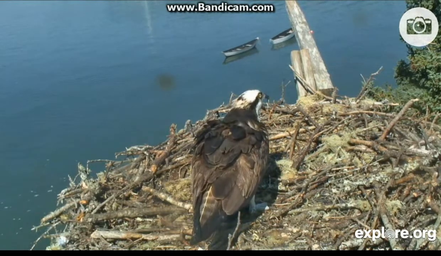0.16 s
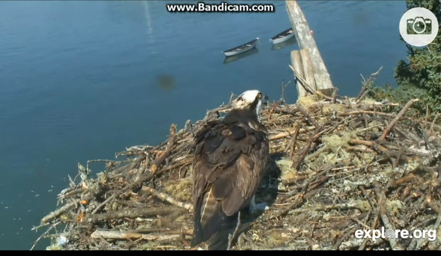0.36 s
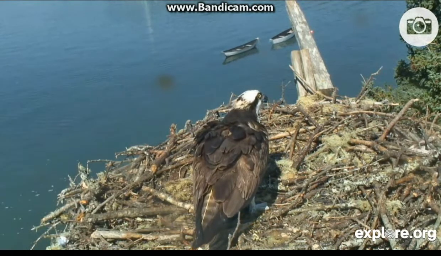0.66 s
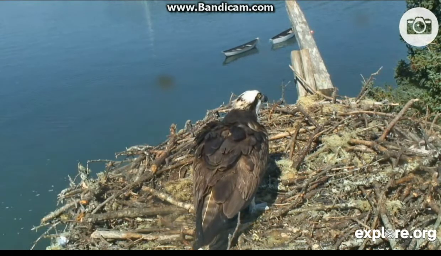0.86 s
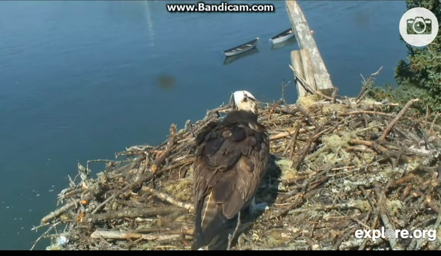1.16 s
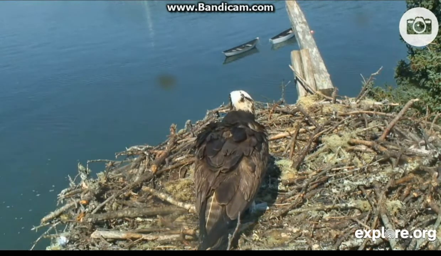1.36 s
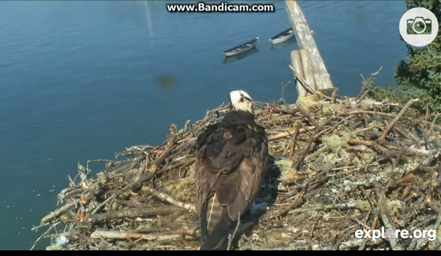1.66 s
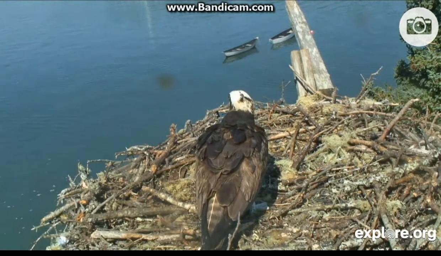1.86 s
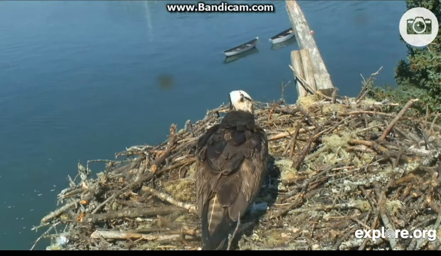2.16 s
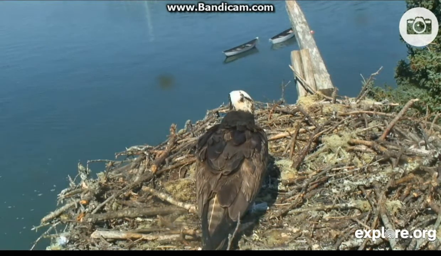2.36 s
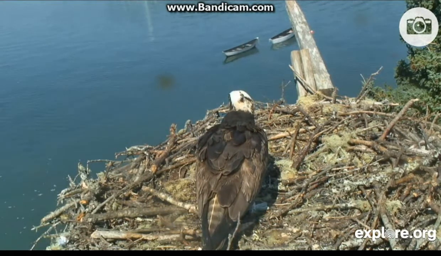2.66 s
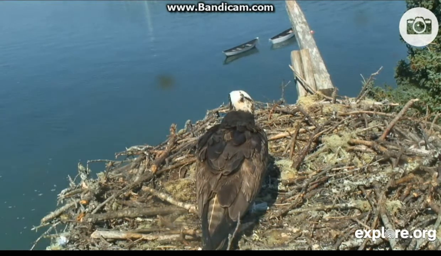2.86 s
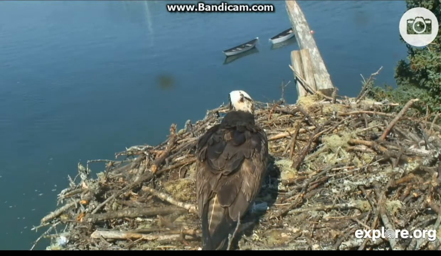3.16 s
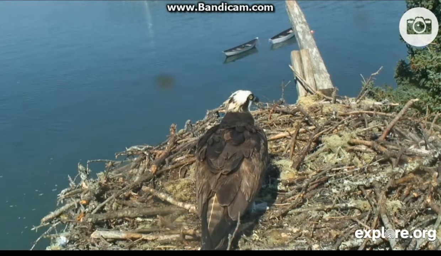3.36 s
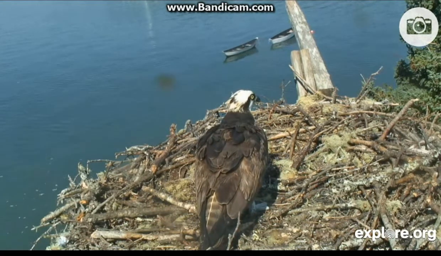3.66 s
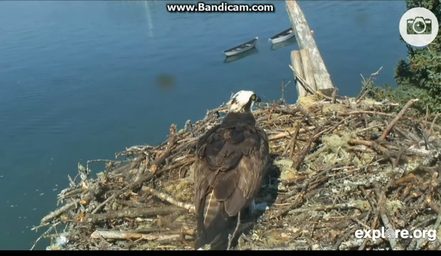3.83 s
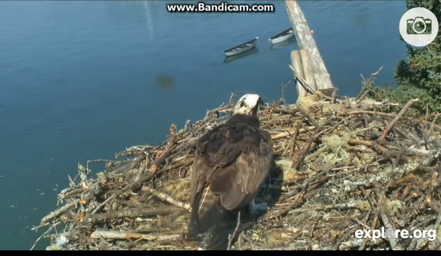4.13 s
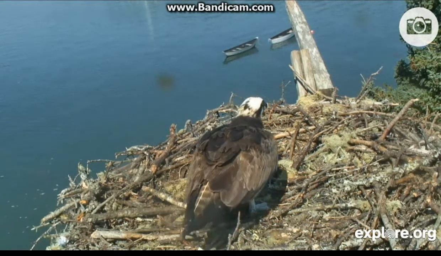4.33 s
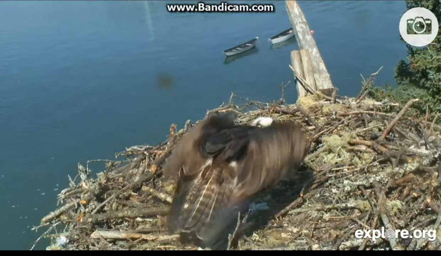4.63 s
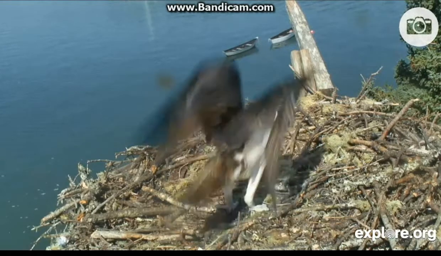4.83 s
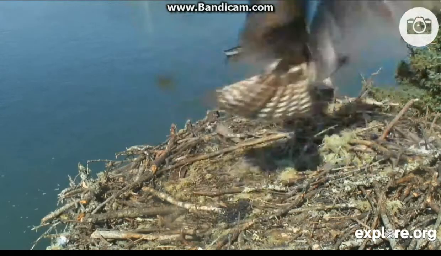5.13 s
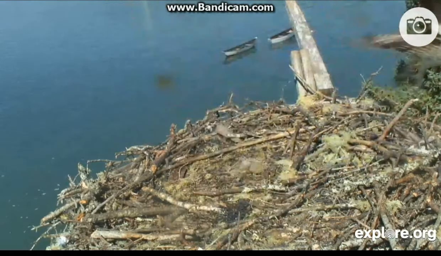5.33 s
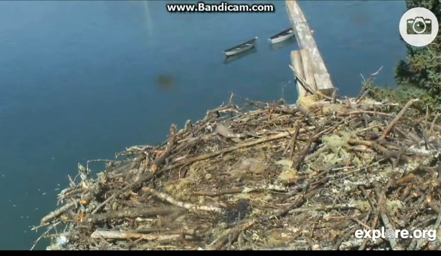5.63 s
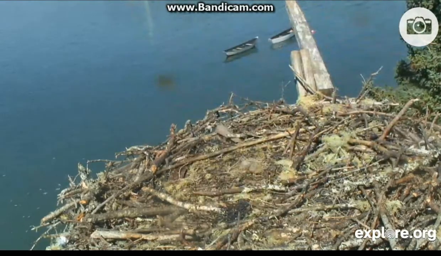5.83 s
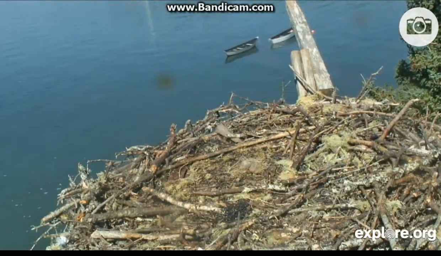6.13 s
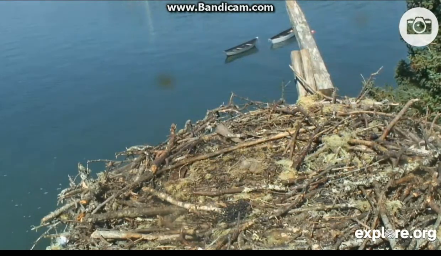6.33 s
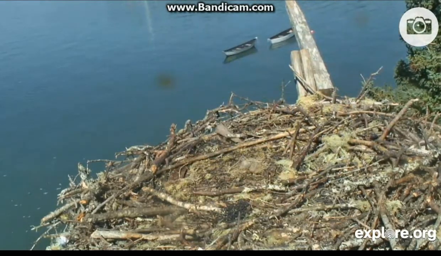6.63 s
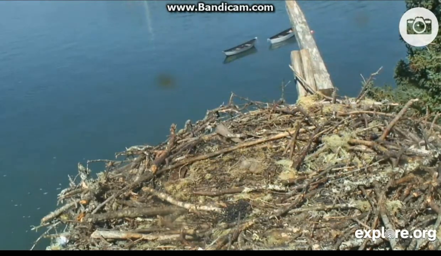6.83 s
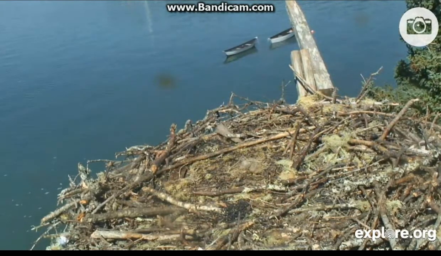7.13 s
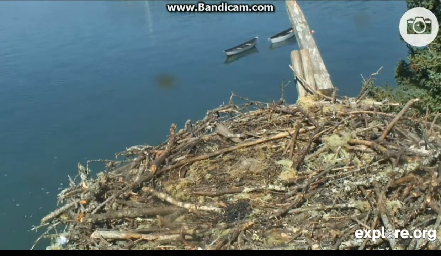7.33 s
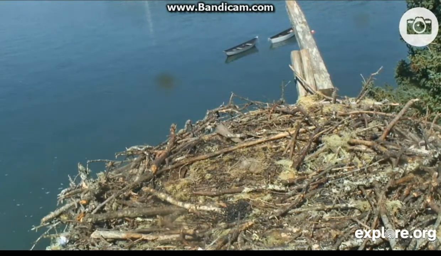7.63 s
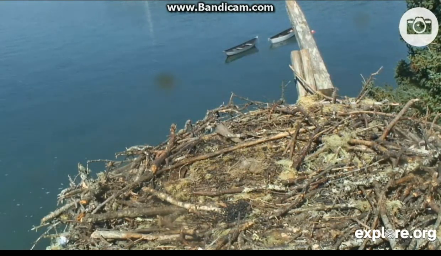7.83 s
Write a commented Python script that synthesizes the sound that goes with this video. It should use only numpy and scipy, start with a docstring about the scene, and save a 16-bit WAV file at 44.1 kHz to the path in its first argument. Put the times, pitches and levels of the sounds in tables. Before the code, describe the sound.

Outdoors at a stick nest above a calm bay, a steady low hum throbs under soft hiss and thin whines. Small waves lap and plip faintly. After about two seconds an osprey gives a few very short, high whistled chirps and clucks, with a faint shore echo. Dry sticks rustle close by and a twig snaps sharply; then only hum and water remain, with a soft wind puff at the end.

```python
"""A stick nest above a quiet bay, where an osprey gives a few short two-voiced chirps, a peep and two clucks.
Its voices are gliding tones with overtones, and the shore returns them as softly scattered echoes.
Filtered random impacts make the nest material rustle close by; damped modes ring as a twig snaps.
Small waves lap below as grainy noise and rising bubble tones.
The nest camera adds a throbbing hum of two close tones, thin whines and hiss."""
import sys
import numpy as np
from scipy import signal
from scipy.fft import rfft, irfft, next_fast_len
from scipy.io import wavfile
from scipy.ndimage import uniform_filter1d, map_coordinates

SR = 44100
rng = np.random.default_rng(int(sys.argv[2]) if len(sys.argv) > 2 else 0)


def bounce(signal):
    """Save signal as a 16-bit WAV file at the path given by the first command-line argument."""
    frames = np.transpose(np.atleast_2d(signal))
    limited = np.clip(frames, -1, 1)
    pcm = np.round(limited * 32767).astype(np.int16)
    wavfile.write(sys.argv[1], SR, pcm)


N = 352359  # samples


def amp(db):
    """Level to gain: 20 dB is a factor of ten in amplitude."""
    return 10 ** (np.asarray(db) / 20)


def unit(x):
    """Normalisation: scale to rms 1."""
    return x / np.sqrt(np.mean(x ** 2) + 1e-20)


def along(points, hz):
    """Interpolation of (Hz, value) points on a logarithmic frequency axis."""
    f, v = np.transpose(points)
    return np.interp(np.log(hz + 1), np.log(f + 1), v)


def wobble(rate):
    """Slow random modulation: a smooth curve through rate random knots a second."""
    knots = rng.standard_normal(int(N * rate / SR) + 4)
    return map_coordinates(knots, [np.arange(N) * rate / SR])


def filtered(x, response):
    """Linear filtering: multiply the spectrum by a response of frequency."""
    m = next_fast_len(N + SR // 2)  # padded so that the end does not wrap round
    return irfft(rfft(x, m) * response(np.fft.rfftfreq(m, 1 / SR)), m)[:N]


def coloured(x, spectrum):
    """Spectral shaping: x filtered by (Hz, dB) points, at rms 1."""
    return unit(filtered(x, lambda hz: amp(along(spectrum, hz))))


def grains(rate, spread_db):
    """Shot noise: random tiny impacts, rate a second, of uneven size, at rms 1."""
    impacts = (rng.random(N) < rate / SR) * rng.standard_normal(N)
    return unit(impacts * amp(spread_db * np.clip(rng.standard_normal(N), -2, 2)))


def add(track, s, sound):
    """Superposition: mix a sound into the track at time s."""
    part = track[max(round(s * SR), 0):][:len(sound)]
    part += sound[:len(part)]


def swell(crest, db, build, ebb):
    """Gaussian envelope: a rounded rise and fall, one gain per sample."""
    t = np.arange(N) / SR - crest
    return amp(db) * np.exp(-(t / np.where(t < 0, build, ebb)) ** 2 / 2)


def together(gains):
    """Incoherent summation: the powers of unrelated sounds add."""
    return np.sqrt(sum(g ** 2 for g in gains))


def whistle(length, glide_hz, jitter, swell_db=0, octave_db=-26, third_db=-42, rasp=4):
    """Frequency modulation: one voice and two overtones glide through evenly spaced pitches."""
    u = np.linspace(0, 1, max(int(length * SR), 8))
    pitch = np.interp(u, np.linspace(0, 1, len(glide_hz)), glide_hz)
    noise = rng.standard_normal((2, SR // 10))
    waver, shimmer = unit(uniform_filter1d(noise, size=24))[:, :len(u)]
    phase = 2 * np.pi * np.cumsum(pitch * (1 + jitter * waver)) / SR
    effort = np.abs(np.sin(np.pi * u)) ** .7
    # overtones come out at full effort and are rougher than the fundamental
    overtones = amp(octave_db) * np.sin(2 * phase) + amp(third_db) * np.sin(3 * phase)
    overtones = overtones * effort ** 2 * (1 + 10 * rasp * jitter * shimmer)
    return amp(swell_db * (u - .5)) * effort * (np.sin(phase) + overtones)


# Background spectrum: frequency_hz, relative density_db [dB per Hz]
HISS = [(25, -7.5), (50, -5), (85, -1.5), (135, -2), (170, -5), (300, -10), (520, -7.5), (700, -19.5),
        (1050, -15.5), (1500, -25.5), (2600, -31), (5000, -32.5), (9000, -34), (12000, -35)]
# Narrow noise humps: centre_hz, width_hz (at half amplitude), level_db (rms)
HISS_PEAKS = [(3063, 130, -84.5), (3697, 690, -81)]


def hiss(hiss_db=-66.0):
    """Stationary noise: a steady broad spectrum with two resonance humps in the treble."""
    out = amp(hiss_db) * coloured(rng.standard_normal(N), HISS)
    for centre, width, db in HISS_PEAKS:
        hump = filtered(rng.standard_normal(N), lambda hz: 1 / (1 + (2 * (hz - centre) / width) ** 2))
        out = out + amp(db) * unit(hump)
    return out


# Two close hum tones: pitch_hz
HUM_HZ = (107.45, 103.116)
# The same two tones: level_db (rms)
HUM_DB = (-45, -60)
HUM_CREST_S = .04  # a moment when the two tones are in phase
# Thin whines: pitch_hz, level_db (rms), waver [0-1]
WHINES = [(211.7, -73.5, 1), (232.1, -79.5, 0.7), (367, -99, 0.8), (430, -72.5, 0.1), (543.6, -78, 0.94),
          (573.6, -81, 0.5), (649.6, -85.5, 0.4), (1029, -78, 0.06), (3117, -86.5, 0.3), (3827, -91, 0.2)]


def hum(drift=0.036, waver_rate=18):
    """Beating: two close low tones throb together, under whines wavering in strength and phase."""
    turn = 2 * np.pi * (np.arange(N) / SR - HUM_CREST_S)
    out = sum(np.sqrt(2) * amp(db) * np.cos(hz * turn) for hz, db in zip(HUM_HZ, HUM_DB))
    out = out * (1 + drift * wobble(15))
    for hz, db, waver in WHINES:
        strength = 1 + 0.33 * waver * wobble(waver_rate)
        tone = np.sin(hz * turn + 1.32 * waver * wobble(waver_rate))
        out = out + amp(db) * unit(strength * tone)
    return out


# Wind puff on the microphone: crest_s, level_db, build_s, ebb_s
GUST = (7.88, -60.5, .08, .35)


def wind():
    """Wind noise: a soft puff rumbles on the microphone, mostly at low frequencies."""
    rumble = [(10, -13), (35, -4), (70, -15.5), (300, -37), (1500, -78.0)]  # Hz, dB
    return swell(*GUST) * coloured(rng.standard_normal(N), rumble)


def bubbles(centre_hz=1500, cycles=9, count=2800):
    """Bubble resonance: many tiny overlapping rings that rise in pitch, at rms 1."""
    out = np.zeros(N)
    for when, (pitch, size) in zip(rng.random(count), rng.standard_normal((count, 2))):
        start_hz = centre_hz * np.exp(.35 * pitch)
        u = np.linspace(0, 1, max(int(cycles * SR / start_hz), 8))
        ring = np.sin(2 * np.pi * cycles * u * (1 + 0.098 * u))
        add(out, when * N / SR, amp(2 * min(size, 1.5)) * ring * np.sin(np.pi * u) * np.exp(-u))
    return unit(out)


# Wavelets reaching the shore: crest_s, relative level_db, build_s, ebb_s
WAVES = [(1.35, -74, .45, 0.5), (1.91, -74, 0.1, .1), (3.0, -67.5, 0.26, 0.31), (4.62, -70.5, 0.54, 0.23),
         (5.99, -71, .015, 0.034), (6.13, -69, 0.051, 0.046), (6.28, -70, 0.06, 0.066),
         (7.58, -73.5, 0.06, 0.045), (7.7, -72.5, 0.041, 0.11)]
RIPPLE_DB = -78  # lapping between the wavelets, on the wavelets' scale
# Spectrum of the wash: frequency_hz, relative density_db [dB per Hz]
WASH = [(150, -10), (500, -1), (1200, -7.5), (2400, -13), (4500, -18.5), (9000, -30.5)]
# Spectrum of fine droplet ticks: frequency_hz, relative density_db [dB per Hz]
DROPLETS = [(500, -16), (1100, -3), (1700, 0), (2600, -2), (3500, -12), (6000, -30)]
DROPLET_RATE, DROPLET_DB = 350, -8  # per s, dB relative to the wavelet
# Small splashes: start_s, level_db (near the peak), centre_hz, length_s
SPLASHES = [(1.184, -65, 1294, 0.027), (1.193, -62, 647, 0.027), (1.329, -68, 1740, 0.019),
            (1.387, -59, 1250, 0.022), (1.392, -70, 1850, 0.013), (1.487, -64, 1200, .012),
            (1.662, -61, 2320, 0.0087), (4.419, -54, 637, 0.0094), (4.424, -70, 1790, 0.0093),
            (4.508, -64, 1240, .014), (4.54, -69, 1490, 0.014), (4.561, -60.5, 1150, 0.01),
            (4.573, -61, 550, 0.019), (4.604, -63, 1290, 0.013), (4.758, -62, 2650, 0.0072),
            (5.983, -68, 1750, 0.015), (6.139, -64, 680, .015), (6.276, -65, 2100, .012),
            (6.877, -71, 2410, 0.016), (7.575, -71, 1470, .014), (7.691, -64, 660, 0.023)]
BUBBLE_RISE, SPLASH_JITTER = (.86, 1.14), .12  # shares of a splash's pitch


def water(wash_db=-2.5, bubble_db=-3.5):
    """Bubble acoustics: wavelets wash, bubble and tick with droplets; brief splashes rise in pitch."""
    lap = together([swell(*wave) for wave in WAVES] + [amp(RIPPLE_DB)])
    wash = amp(wash_db) * coloured(grains(rate=2500, spread_db=1), WASH)
    # bubbles gain on the wash as a wavelet crests
    bubbling = amp(bubble_db) * np.sqrt(lap / lap.max()) * bubbles()
    droplets = amp(DROPLET_DB) * coloured(grains(rate=DROPLET_RATE, spread_db=2.5), DROPLETS)
    out = lap * (wash + bubbling + droplets)
    for s, db, centre_hz, length in SPLASHES:
        add(out, s, amp(db) * whistle(length, centre_hz * np.array(BUBBLE_RISE), SPLASH_JITTER, rasp=0))
    return out


SHUFFLE_RISE_S = 0.017


def shuffle(s, fade):
    """Frictional decay: a quick push into the nest material, which then comes to rest."""
    t = np.arange(N) / SR - s
    return np.exp(-np.where(t < 0, (t / SHUFFLE_RISE_S) ** 2 / 2, t / fade))


# Shuffles in the nest: peak_s, fade_s (time constant), crackle_db, relative bump_db
SHUFFLES = [(0.93, 0.035, -83, -57.5), (1.0, 0.072, -91, -63), (2.771, 0.12, -72, -67),
            (2.89, 0.18, -66.5, -60), (3.03, 0.096, -71, -62), (3.109, 0.051, -82, -49),
            (3.143, 0.07, -66, -58), (3.3, 0.031, -68.5, -66), (3.395, 0.092, -70, -57),
            (3.58, 0.036, -75.5, -67), (3.679, 0.042, -70, -58)]
# Spectrum of the fine crackle: frequency_hz, relative density_db [dB per Hz]
CRACKLE = [(900, -18), (1800, 5), (3500, 8), (6000, 3.5), (9000, 4.5), (12000, -4)]
# Spectrum of the dull bumps: frequency_hz, relative density_db [dB per Hz]
BUMP = [(30, 1), (150, 5.5), (300, -2.5), (480, 7), (700, -3.5), (950, -2), (1500, -12), (3000, -23.5),
        (6000, -29)]
# Dry stems settling afterwards: crest_s, level_db, build_s, ebb_s
SETTLING = (3.7, -82, .5, .45)
# Spectrum of the settling: frequency_hz, relative density_db [dB per Hz]
SETTLING_COLOUR = [(1500, -10), (4000, -8), (7000, -9), (8800, 4), (10200, -8), (12000, -12)]


def rustle(bump_db=-3):
    """Crackling noise: dry nest material gives fine impacts and dull bumps at each shuffle, then settles."""
    pushes = [(shuffle(s, fade), fine_db, dull_db) for s, fade, fine_db, dull_db in SHUFFLES]
    crackle = together(amp(db) * push for push, db, _ in pushes)
    bump = together(amp(db) * push for push, _, db in pushes)
    fine = coloured(grains(rate=10000, spread_db=-6), CRACKLE)
    dull = coloured(grains(rate=4500, spread_db=4.0), BUMP)
    settling = swell(*SETTLING) * coloured(grains(rate=11000, spread_db=-0.5), SETTLING_COLOUR)
    return crackle * fine + amp(bump_db) * bump * dull + settling


def burst(length, centre_hz, sharpness):
    """Band resonance: a brief noisy ring in one band."""
    hz = np.fft.rfftfreq(SR // 5, 1 / SR) + 1
    u = np.linspace(0, 1, max(int(length * SR), 8))
    band = 1 / (1 + (sharpness * (hz / centre_hz - centre_hz / hz)) ** 2)
    noise = irfft(rfft(rng.standard_normal(SR // 5)) * band)[:len(u)]
    return unit(noise) * np.sin(np.pi * u) * np.exp(-u)


# Twigs scraping over each other: crest_s, level_db, build_s, ebb_s (its sign has no effect)
SCRAPE = (3.5, -79, 0.32, -0.1)
# Single stems ticking in the nest: start_s, level_db (rms before the envelope), centre_hz
STEMS = [(0.562, -63, 2400), (.934, -58.5, 1580), (.946, -62, 1900), (1.022, -66, 2100), (1.191, -69, 1570),
         (1.497, -64, 2500), (2.751, -57.5, 1600), (2.765, -66, 2600), (2.927, -60, 1200),
         (3.008, -54.5, 1900), (3.048, -58, 2200), (3.142, -53, 1050), (3.21, -60, 1800),
         (3.309, -66, 2700)]
STEM_S = 0.0064  # length of a tick


def stems():
    """Stick-slip friction: twigs scrape in a dense crackle and single stems tick."""
    colour = [(400, -22), (1100, 1), (2200, -4), (3800, -10), (6000, -20)]  # Hz, dB per Hz
    out = swell(*SCRAPE) * coloured(grains(rate=860, spread_db=-4), colour)
    for s, db, centre_hz in STEMS:
        add(out, s, amp(db) * burst(STEM_S, centre_hz, sharpness=2.2))
    return out


# The snap: start_s, level_db, crack_db (relative to level_db)
SNAPS = [(3.2722, -39, -3.5)]
# Modes of the stick: pitch_hz, level_db (relative to the snap), t60_s
TWIG = [(333, -7, 0.02), (545, -2, 0.03), (880, -4, 0.017), (2640, -10, 0.0087), (3320, -1, 0.005),
        (5400, -6.5, 0.0079), (9100, 3, 0.002)]


def twig(crack_t60=0.012):
    """Modal decay: fracture gives a sharp crack of noise and leaves the stick's modes ringing briefly."""
    out, t = np.zeros(N), np.arange(SR // 10) / SR
    for s, db, crack_db in SNAPS:
        ring = np.zeros(len(t))
        for k, (hz, level, t60) in enumerate(TWIG):
            direction = (-1) ** k  # the modes swing in alternating directions
            ring += direction * amp(level - 60 * t / t60) * np.sin(2 * np.pi * hz * t)
        crack = amp(crack_db - 60 * t / crack_t60) * rng.standard_normal(len(t))
        add(out, s, amp(db) * (ring + crack))
    return out


# Echoes from the nearby shore: delay_s, level_db (relative to the call), spread_s
ECHOES = [(.019, -25, .004), (.046, -19, .01), (.105, -24.5, .016)]
# Decay of the tail: frequency_hz, t60_s
SHORE = [(500, .6), (2500, 0.69), (8000, .23)]


def shore(x, tail_db=-23, delay=.03, size=640):
    """Diffuse scattering: shore and trees return each call as a grainy haze of its own pitches."""
    frames = dict(fs=SR, nperseg=size, noverlap=size - size // 4)
    hz, t, z = signal.stft(x, **frames)
    lag = t[t < 1]
    shares = lambda power: (power / power.sum(axis=-1, keepdims=True))
    decay = (lag > delay) * amp(-60 * lag / along(SHORE, hz)[:, None]) ** 2
    answer = amp(tail_db) ** 2 * shares(decay)
    for s, db, spread in ECHOES:
        answer = answer + amp(db) ** 2 * shares(np.exp(-((lag - s) / spread) ** 2))
    # powers are spread over time, then carried by random phases
    power = np.abs(signal.fftconvolve(np.abs(z) ** 2, answer, axes=1)[:, :len(t)])
    scatter = signal.stft(rng.standard_normal(N), **frames)[2]
    return signal.istft(np.sqrt(power) * scatter / scatter.std(), **frames)[1][:N]


# Two-voiced chirps: start_s, length_s, upper_hz, upper_db, upper_octave_db, lower_hz, lower_db,
# lower_octave_db, lower_swell_db (start to end), catch_db, catch_s, waver [share of pitch];
# octave levels are relative to their voice
CHIRPS = [(2.3418, 0.031, 2840, -44, -13.5, 2355, -43.5, -32, 4, -49, 0.0032, 0.01),
          (2.5235, 0.022, 2804, -42, -20, 2465, -44.5, -30, 5, -50, 0.0033, 0.019),
          (2.9013, 0.015, 2720, -57, -20, 2370, -41.5, -17, -18, -50, .006, 0.011)]
# Upper voice, a rise then a hold: successive pitches [share of its note]
UPPER_GLIDE = (.94, .975, .995, 1.005, 1.012, 1.008, .99)
# Lower voice, a hold then a sag: successive pitches [share of its note]
LOWER_GLIDE = (1.025, 1.025, 1.012, .995, .975, .955, .935)
UPPER_SWELL_DB = -1  # the upper voice eases as the lower one takes over
UPPER_SHARE, LOWER_SHARE = .88, .8  # of the chirp's length: the upper starts first, the lower ends last
VOICE_LAG_S = .0042  # the voices follow the catch
# Opening catch, the pitch shooting up: successive pitch_hz
SQUEAK_HZ = (1100, 2400, 3450, 3550, 3500, 3300)
# the catch then cracks down into the voices
CRACK_HZ, CRACK_LAG_S, CRACK_S = (2700, 2450, 2200, 2300), .0028, .003
CRACK_DB = 6  # over the squeak
# Arching peep, then a lower note: start_s, length_s, level_db, swell_db, octave_db, successive pitch_hz
PEEP = [(2.4924, 0.027, -49.5, 9, -15.5, (2800, 2920, 2970, 2970, 2930, 2830, 2680)),
        (2.516, 0.0086, -50, 0, -35, (2480, 2400, 2100))]
# Short rough clucks: start_s, length_s, pitch_hz, level_db
CLUCKS = [(2.715, 0.0077, 2450, -48), (2.8305, .007, 1950, -56)]
CLUCK_GLIDE, CLUCK_JITTER = (.45, .9, 1.03, 1.03, 1.02, .85), .12  # shares of the pitch; a scoop upward


def osprey():
    """Two-source phonation: both sides of the syrinx sing, the lower voice joining and beating with the upper."""
    out = np.zeros(N)
    for (s, length, upper_hz, upper_db, upper_octave_db, lower_hz, lower_db, lower_octave_db,
         lower_swell_db, catch_db, catch_s, waver) in CHIRPS:
        upper_glide_hz = upper_hz * np.array(UPPER_GLIDE)
        lower_glide_hz = lower_hz * np.array(LOWER_GLIDE)
        upper = whistle(UPPER_SHARE * length, upper_glide_hz, waver, UPPER_SWELL_DB, upper_octave_db)
        lower = whistle(LOWER_SHARE * length, lower_glide_hz, waver, lower_swell_db, lower_octave_db)
        squeak = whistle(catch_s, SQUEAK_HZ, jitter=0.032)
        crack = whistle(CRACK_S, CRACK_HZ, jitter=.05)
        add(out, s, amp(catch_db) * squeak)
        add(out, s + CRACK_LAG_S, amp(catch_db + CRACK_DB) * crack)
        add(out, s + VOICE_LAG_S, amp(upper_db) * upper)
        add(out, s + VOICE_LAG_S + (1 - LOWER_SHARE) * length, amp(lower_db) * lower)
    for s, length, db, swell_db, octave_db, glide_hz in PEEP:
        peep = whistle(length, glide_hz, jitter=.003, swell_db=swell_db, octave_db=octave_db)
        add(out, s, amp(db) * peep)
    for s, length, hz, db in CLUCKS:
        glide_hz = hz * np.array(CLUCK_GLIDE)
        cluck = whistle(length, glide_hz, CLUCK_JITTER, octave_db=-42, third_db=-60, rasp=0)
        add(out, s, amp(db) * cluck)
    return out


def scene():
    """Superposition: all sources add at the one microphone."""
    bird = osprey()
    nest = rustle() + stems() + twig()
    background = water() + hum() + hiss() + wind()
    return (bird + shore(bird) + nest + background)[None]


TOP_HZ = 12050


def record(dry):
    """Band limiting: the camera cuts steeply above its top frequency."""
    return filtered(dry[0], lambda hz: 1 / np.sqrt(1 + (hz / TOP_HZ) ** 120))[None]


dry = scene()
out = record(dry)
bounce(out)
```